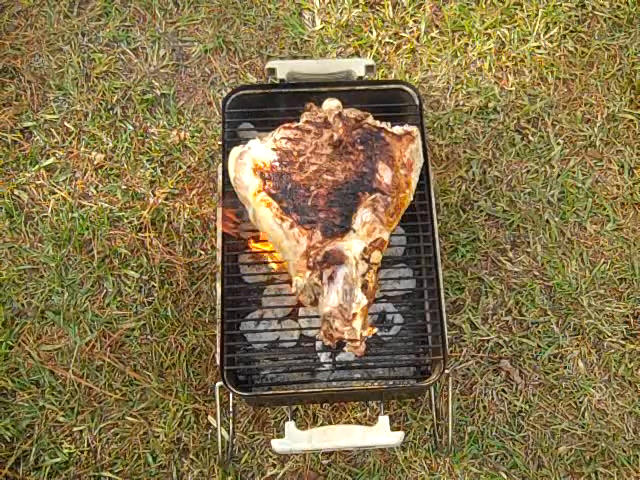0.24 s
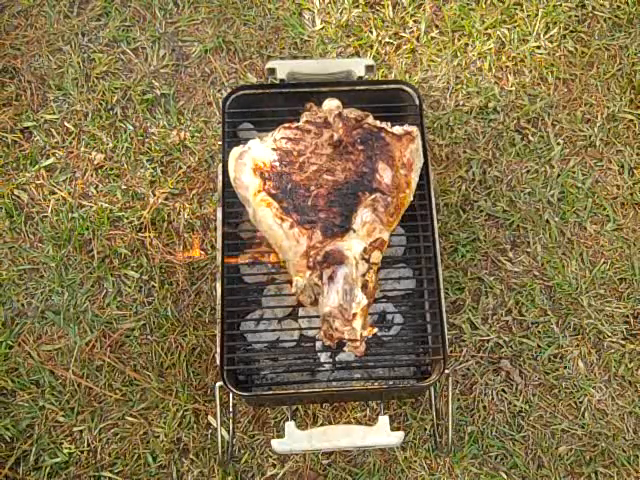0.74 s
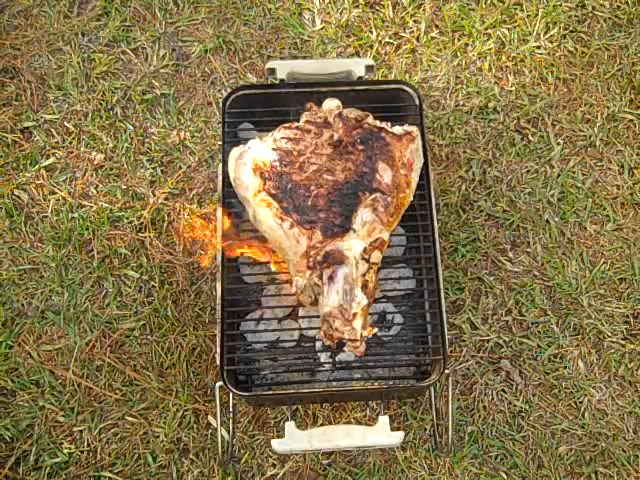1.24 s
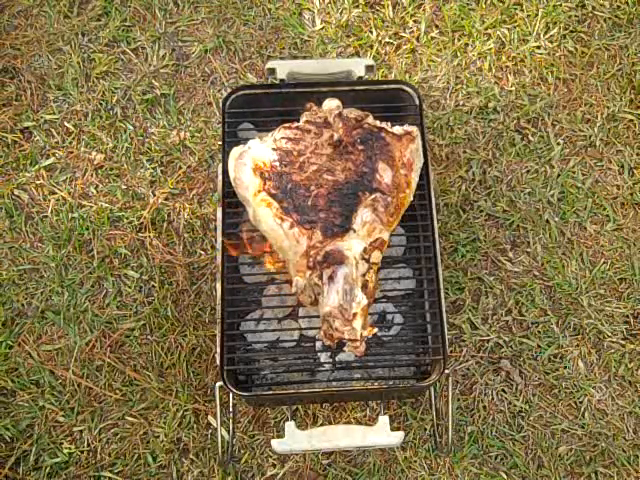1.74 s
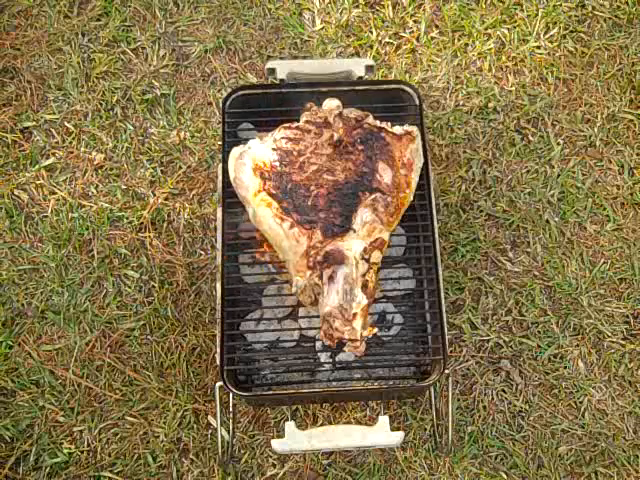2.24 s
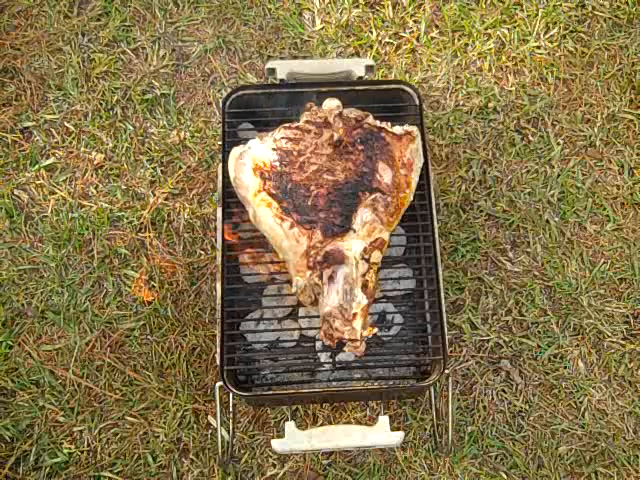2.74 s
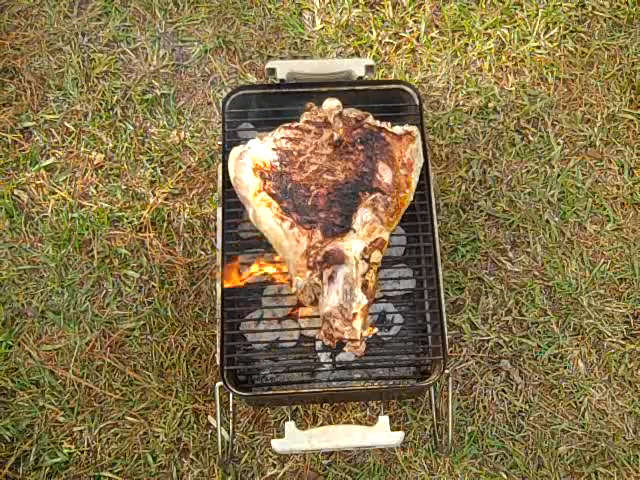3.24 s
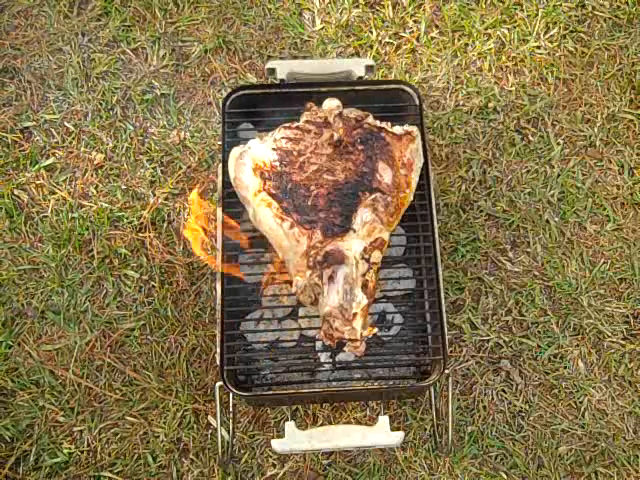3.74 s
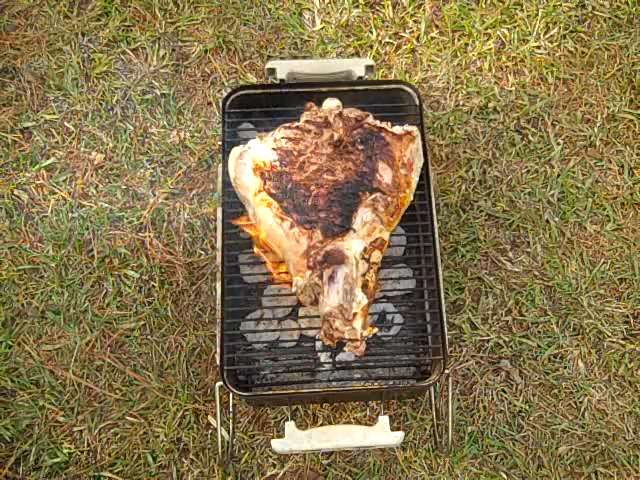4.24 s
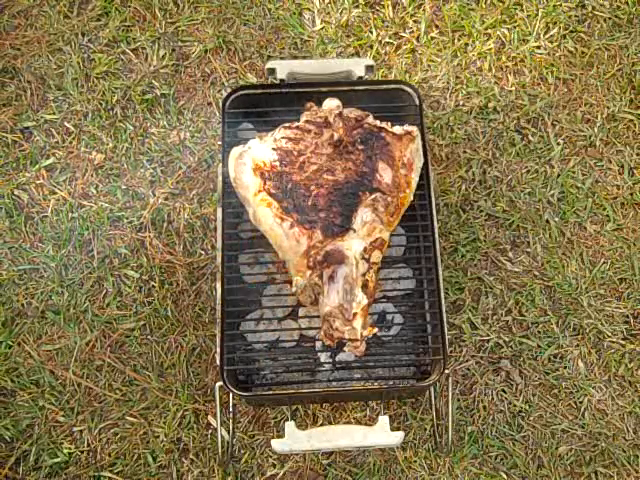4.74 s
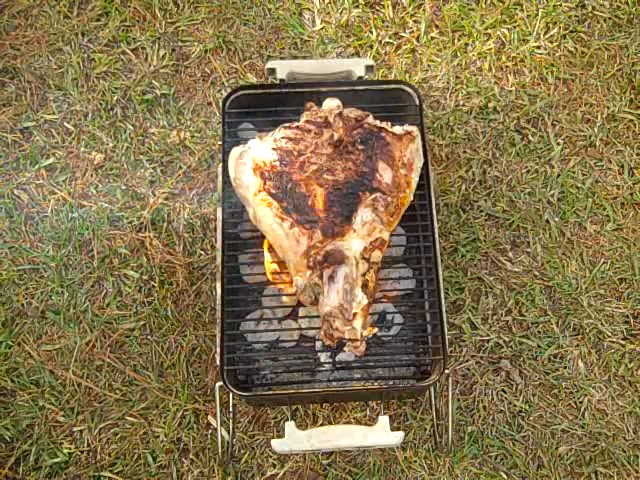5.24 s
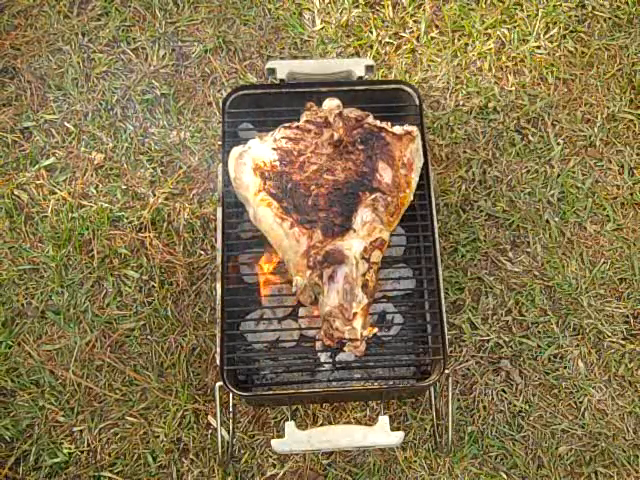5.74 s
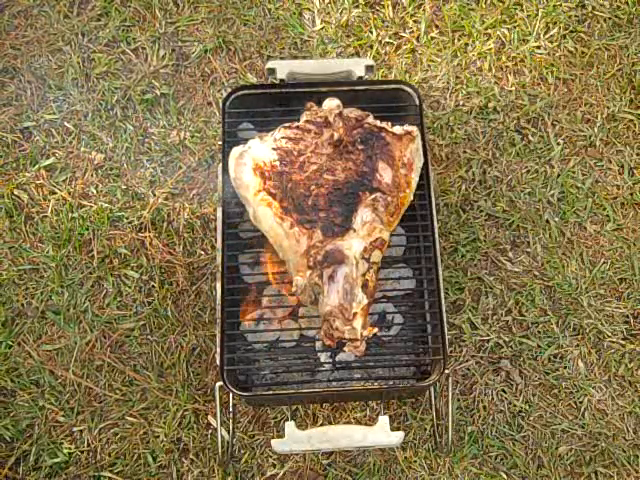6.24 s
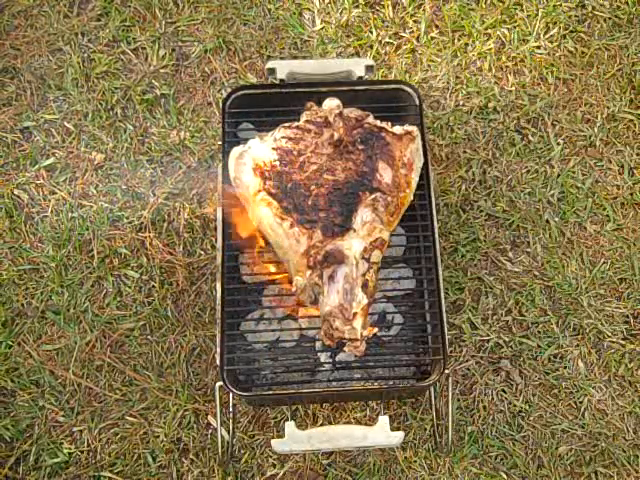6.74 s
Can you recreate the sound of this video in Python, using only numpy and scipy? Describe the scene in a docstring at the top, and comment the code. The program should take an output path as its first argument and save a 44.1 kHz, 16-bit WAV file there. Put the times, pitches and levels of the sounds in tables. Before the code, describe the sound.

A large cut of fatty meat sizzles on a small sheet-metal charcoal grill on a lawn, heard close from above. Bright, fluttering steam hiss and fine crackle run throughout, surging briefly as fat drips and boils. Sharp pops come in irregular clusters, some with a soft low thud. The hollow pan adds a faint ring; quiet outdoor air and slight microphone hiss lie beneath.

```python
"""Fatty meat sizzles over burning charcoal in a small sheet-metal grill on a lawn, heard from above.
Steam is fluttering noise, crackle a random shower of tiny noise bursts, and both surge as fat boils up.
The hollow fire pan rings along through two resonances. Louder pops are snapped noise bursts, and thuds
are short pushes of air; faint open-air rumble and a slow heave of pressure lie underneath."""
import sys
import numpy as np
from scipy import signal
from scipy.fft import rfft, irfft
from scipy.io import wavfile
from scipy.ndimage import uniform_filter1d

SR = 44100
rng = np.random.default_rng(int(sys.argv[2]) if len(sys.argv) > 2 else 0)


def gain_from_db(level_db):
    """Convert decibel levels to linear amplitude factors (20 dB per decade)."""
    decades = np.asarray(level_db, float) / 20
    return 10 ** decades


def dump(signal):
    """Clip the signal to [-1, 1] and save it as 16-bit WAV at the path in sys.argv[1]."""
    limited = np.clip(np.atleast_2d(signal).T, -1, 1)
    pcm = np.round(limited * 32767).astype(np.int16)
    wavfile.write(sys.argv[1], SR, pcm)


N = 308259


def level(x, db):
    """Scale to an rms level in dB."""
    return x * gain_from_db(db) / np.sqrt(np.mean(x ** 2))


def colour(x, table):
    """Shape the tone with a causal, minimum-phase filter through (Hz, dB) points."""
    hz, db = np.transpose(table)
    bin_hz = np.arange(2049) * SR / 4096
    log_gain = np.interp(np.log(bin_hz + 1), np.log(hz), np.log(gain_from_db(db)))
    cepstrum = irfft(log_gain)
    # fold the backward half onto the forward half, so that nothing sounds ahead of time
    cepstrum[1:2048] *= 2
    cepstrum[2049:] = 0
    impulse = irfft(np.exp(rfft(cepstrum)))
    return signal.fftconvolve(x, impulse)[:N]


def band(x, hz, width):
    """Two-pole resonance, gain 1 at the centre; width in Hz."""
    return signal.lfilter(*signal.iirpeak(hz, hz / width, fs=SR), x)


def walk(rate):
    """Random wander: levels held 1 / rate seconds and slewed twice; spread near 1."""
    hold = int(SR / rate)
    steps = np.repeat(rng.standard_normal(N // hold + 1), hold)
    return 1.3 * uniform_filter1d(uniform_filter1d(steps, hold), hold)[:N]


def bursts(hz, decay_ms, sharp, snap_db):
    """For each centre frequency a sharp snap, then a spit of noise dying fast; envelope peak near 1."""
    t = np.arange(256) / SR
    spit = rng.standard_normal((len(hz), len(t))) * np.exp(-t * 1000 / decay_ms)
    spit[:, 0] = gain_from_db(snap_db) * np.sign(spit[:, 0])
    spit = np.array([band(noise, f, f / sharp) for noise, f in zip(spit, hz)])
    peak_power = uniform_filter1d(spit ** 2, size=30).max(axis=1, keepdims=True)
    return spit / np.sqrt(2 * peak_power)


# Heat under the fat between flare-ups.
# Each row: time in seconds, sizzle gain in dB, gain of the pan's lower ring in dB.
SIMMER = [(0, -43.5, -51.5), (.7, -48, -57.5), (1.5, -47, -53.5), (2.2, -42.5, -53.5), (3, -45, -54),
          (3.7, -42.5, -54.5), (4.5, -47, -55.5), (5.2, -46.5, -59.5), (5.8, -46, -56.5), (6.4, -48, -58.5),
          (6.99, -50.5, -63.5)]
# Fat runs onto the coals and boils up.
# Each row: peak in seconds, half length in seconds (down to 1/e of the power), sizzle gain in dB,
# gain of the pan's lower ring in dB.
SURGES = [(0.218, 0.14, -45, -54), (0.273, 0.023, -39, -55), (0.458, 0.023, -38, -56),
          (0.603, 0.034, -45.0, -56), (0.758, 0.042, -45, -59), (0.847, 0.036, -41.5, -47.5),
          (1.055, 0.062, -45.5, -55), (1.172, 0.038, -43, -49), (1.266, 0.029, -38.5, -47),
          (1.348, 0.037, -38, -49), (1.46, 0.025, -48, -60), (1.623, 0.051, -40, -56),
          (1.79, 0.076, -45.5, -47), (1.934, 0.076, -39, -52), (2.166, 0.046, -43.5, -49),
          (2.33, 0.035, -51, -55), (2.514, 0.022, -46.5, -55), (2.61, 0.042, -50, -61),
          (2.822, 0.035, -38.5, -55), (2.905, 0.02, -36, -48), (3.019, 0.053, -39, -46),
          (3.206, 0.027, -42.5, -61), (3.41, 0.023, -48, -58), (3.465, 0.03, -40, -49),
          (3.9, 0.055, -42, -64), (3.952, 0.033, -51, -60), (4.023, 0.033, -46, -68),
          (4.322, 0.085, -41.5, -55), (4.538, 0.062, -40.5, -60), (5.091, 0.15, -40.5, -50.5),
          (5.26, 0.025, -39.5, -57), (5.444, 0.032, -40.5, -65), (5.613, 0.026, -39, -55),
          (5.714, 0.072, -40.5, -51), (5.912, 0.028, -48.5, -59), (6.09, 0.05, -50, -67),
          (6.294, 0.04, -40.5, -53), (6.38, 0.1, -47.5, -61), (6.588, 0.013, -49, -76),
          (6.818, 0.065, -45, -56), (6.927, 0.042, -47.5, -53.5)]


def boil():
    """Bell-shaped surges add their power to the simmer; gives dB of sizzle and of the pan's lower ring."""
    t = np.arange(N) / SR
    s, *columns = np.transpose(SIMMER)
    simmer_db = np.array([np.interp(t, s, column) for column in columns])
    power = gain_from_db(simmer_db) ** 2
    for peak_s, half_s, *surge_db in SURGES:
        bell = np.exp(-((t - peak_s) / half_s) ** 2)
        power = power + gain_from_db(np.array(surge_db))[:, None] ** 2 * bell
    return 10 * np.log10(power)


def steam():
    """Hiss that flutters as vapour jets open and close."""
    flutter_db = 0.66 * walk(40) + 2.44 * walk(130)
    return level(gain_from_db(flutter_db) * rng.standard_normal(N), 0)


def crackle(per_s=600, spread_db=5.5, most_db=18):
    """Small bubbles burst in random clusters; many are tiny, few are large, each kind has its own pitch."""
    crowd = gain_from_db(2.5 * walk(50))  # thickens and thins the shower
    when = rng.random(N) < crowd * per_s / SR
    size_db = np.minimum(spread_db * rng.exponential(size=N), most_db)
    size = gain_from_db(size_db) * when
    kinds = bursts(np.geomspace(1800, 10000, 16), decay_ms=0.35, sharp=0.67, snap_db=7.0)
    kind = rng.integers(len(kinds), size=N)
    shower = sum(signal.fftconvolve(size * (kind == k), spit)[:N] for k, spit in enumerate(kinds))
    return level(shower, 0)


def patchy(x, drift_db=2.14, flicker_db=1.0):
    """Many spots fry at once, each with its own pitch: every half octave swells and flickers alone."""
    count = 10
    # half octaves above 700 Hz; the end bands take all that lies beyond them
    place = 2 * np.log2((np.fft.rfftfreq(N, 1 / SR) + 1) / 700)
    spectrum = rfft(x)
    mix = np.zeros(N)
    for row in np.eye(count):
        spot = irfft(spectrum * np.interp(place, np.arange(count), row), N)
        mix += gain_from_db(drift_db * walk(7) + flicker_db * walk(30)) * spot
    return mix


# Tone of the sizzle. Each row: frequency in Hz, relative density in dB per Hz.
COLOUR = [(200, -5), (900, 1), (2000, 1.5), (3200, -2.5), (6000, 3), (8800, 2.5), (10500, 0), (13000, -4.5)]


def sizzle(hiss, spits):
    """Steam and crackle fry in patches and take on the bright sizzle tone."""
    return level(colour(patchy(hiss + gain_from_db(-1.1) * spits), COLOUR), 1.35)


# Air in the fire pan. Each row: resonance in Hz, width in Hz, relative gain in dB.
PAN = [(529.3, 230, 3.5), (1606, 275, -7)]


def fire_pan(x):
    """The hollow under the grate rings at its quarter-wave and near three times that; steep flanks."""
    rings = []
    for hz, width, db in PAN:
        ring = x
        for _ in range(3):  # three wide resonances in a row come out about half as wide
            ring = band(ring, hz, 2 * width)
        rings.append(gain_from_db(db) * ring)
    return np.array(rings)


# Tone of the open-air rumble. Each row: frequency in Hz, relative density in dB per Hz.
AIR = [(25, -6), (54, -15.5), (113, -22), (293, -15.5), (1000, -16), (3000, -28.5)]


def breeze():
    """Faint coloured-noise rumble, and a slow heave of pressure on the microphone."""
    gusts = rng.standard_normal(N) * gain_from_db(1.2 * walk(6.8))
    rumble = level(colour(gusts, AIR), -60)
    heave = uniform_filter1d(walk(16) * gain_from_db(2.8 * walk(2.7)), size=2000)
    return rumble + gain_from_db(-55.5) * heave


# The loudest bursts. Each row: time in seconds, crack peak in dB ahead of the tone shaping,
# crack centre in Hz.
POPS = [(0.1162, -17, 5300), (0.2433, -22, 2700), (0.3123, -24, 4200), (0.3246, -27, 3200),
        (0.3388, -18.5, 4550), (0.402, -24.5, 7100), (0.4658, -23, 3320), (0.4825, -25, 5400),
        (0.4871, -21.5, 5600), (0.5098, -18.5, 4350), (0.7728, -24, 5300), (0.8691, -25.5, 5030),
        (0.9832, -29, 4200), (1.0286, -23, 2260), (1.068, -24, 3970), (1.1203, -31, 6000),
        (1.1896, -27, 6500), (1.2683, -22, 4700), (1.2737, -24.5, 6810), (1.2885, -25, 5300),
        (1.3077, -28, 6600), (1.3315, -24, 3780), (1.4055, -23.5, 3360), (1.5947, -16, 5300),
        (1.5993, -17, 5200), (1.6102, -18.5, 3800), (1.613, -18.5, 4000), (1.6387, -21, 5600),
        (1.646, -21, 3100), (1.6603, -13, 7000), (1.7564, -23, 3100), (1.7807, -28, 3480),
        (1.8078, -26, 6000), (1.8564, -23, 5460), (1.8929, -27, 5100), (2.0249, -25, 6200),
        (2.1663, -27, 2760), (2.2065, -23.5, 3840), (2.3161, -24.5, 4300), (2.7808, -21, 8250),
        (2.7938, -24, 4900), (2.833, -24, 3700), (2.8658, -27, 4500), (2.8855, -19.5, 3260),
        (2.8928, -26, 6500), (2.9249, -22, 4100), (2.9572, -19.5, 6400), (3.0392, -23.5, 3950),
        (3.0905, -26, 6900), (3.188, -26, 8000), (3.2305, -29, 5300), (3.2457, -23.5, 5700),
        (3.2879, -26, 4000), (3.456, -24, 6100), (3.4975, -22, 7400), (3.4998, -19, 4700),
        (3.5201, -24.5, 6400), (3.5486, -23, 6900), (3.83, -22.5, 6200), (3.977, -26, 5600),
        (4.0002, -18.5, 2170), (4.0202, -20, 2920), (4.039, -21, 7300), (4.2427, -24.5, 7900),
        (4.3272, -17, 4760), (4.3332, -21, 3600), (4.3455, -22, 5170), (4.3534, -19.5, 4100),
        (4.38, -14, 3180), (4.532, -23.5, 5000), (4.559, -22, 7500), (4.6511, -17, 5300),
        (4.673, -23, 4200), (4.7655, -25.5, 2200), (4.8028, -23.5, 7700), (4.8578, -24.5, 5900),
        (5.0026, -27, 4370), (5.125, -22, 4700), (5.3142, -22, 6200), (5.3266, -20.5, 3300),
        (5.348, -18.5, 3800), (5.4433, -21.5, 4230), (5.4498, -16.5, 6300), (5.4665, -19, 6600),
        (5.5026, -21, 3750), (5.5275, -24.5, 2800), (5.6028, -24, 4000), (5.759, -16, 5800),
        (5.8963, -21.5, 7040), (6.0136, -25, 4600), (6.2743, -27, 5000), (6.3936, -24, 6300),
        (6.817, -22, 3940)]


def pops():
    """Each big fat bubble bursts as a crack: a snap and a short spit of noise around its own pitch."""
    s, crack_db, hz = np.transpose(POPS)
    starts = (s * SR).astype(int) - 12  # a few samples of lead
    cracks = np.zeros(N + 256)
    for i, db, burst in zip(starts, crack_db, bursts(hz, decay_ms=0.99, sharp=0.55, snap_db=15.5)):
        cracks[i:i + len(burst)] += gain_from_db(db) * burst
    # big bubbles are too slow for the top octave
    cracks = signal.lfilter(*signal.butter(3, 12000, fs=SR), cracks[:N])
    # the microphone's bright emphasis near 9 kHz
    return cracks + gain_from_db(-3.5) * band(cracks, 9100, 2500)


# Bursts that shove the air. Each row: time in seconds, bass peak in dB.
THUDS = [(0.3114, -46), (0.3237, -38.5), (0.3391, -34.5), (0.4658, -36.5), (0.4865, -41), (0.5096, -41.5),
         (0.7815, -44), (0.8705, -43), (1.2735, -48), (1.6098, -37), (1.6385, -35), (1.6601, -29),
         (1.7582, -45), (1.8929, -47), (2.109, -41.5), (2.6122, -45.5), (2.8545, -43.5), (3.2305, -46),
         (3.4564, -46.5), (3.5505, -48.5), (3.78, -42.5), (4.0005, -46), (4.3278, -45), (4.347, -45),
         (4.3802, -32.5), (4.6511, -41.5), (5.3483, -42.5), (5.4437, -37.5), (5.503, -38), (6.0136, -49),
         (6.6506, -45.5)]


def thuds(push_ms=0.42):
    """A short one-way push of air that reaches the bass, inward or outward at random."""
    s, push_db = np.transpose(THUDS)
    shoves = np.zeros(N)
    shoves[(s * SR).astype(int)] = gain_from_db(push_db) * rng.choice([-1, 1], len(s))
    t_ms = np.arange(-64, 65) * 1000 / SR
    push = np.exp(-.5 * (t_ms / (push_ms / 4)) ** 2)
    push *= SR / (2 * 290 * push.sum())  # peak 1 within a bass band 290 Hz wide
    return np.convolve(shoves, push, "same")


def scene():
    """Sizzle, pops and thuds, the pan that sizzle and pops excite, and the air."""
    sizzle_db, ring_db = boil()
    ring_db = ring_db + 1.5 * walk(20)  # the lower ring also wanders by itself
    hiss, spits = steam(), crackle()
    frying = gain_from_db(sizzle_db) * sizzle(hiss, spits)
    low, high = level(fire_pan(hiss + gain_from_db(11.5) * spits), -0.15)
    # the upper ring swells with the sizzle
    ring = gain_from_db(ring_db) * low + gain_from_db(sizzle_db - 18.0) * high
    air = breeze()
    cracks = pops()
    burst_ring = fire_pan(gain_from_db(8.5) * cracks).sum(axis=0)
    return (frying + ring + air + cracks + burst_ring + thuds())[None]


def roll_off(x):
    """The treble ends steeply here."""
    return signal.sosfilt(signal.butter(12, 14540, fs=SR, output="sos"), x)


def record(dry):
    """The microphone adds its own even hiss, and the camera cuts the top steeply above 13300 Hz."""
    own_hiss = level(band(rng.standard_normal(N), 7900, 4300), -58.5)
    top_cut = signal.ellip(12, .3, 70, 13300, fs=SR, output="sos")
    mix = signal.sosfilt(top_cut, dry + own_hiss)
    return roll_off(mix)


dry = scene()
out = record(dry)
dump(out)
```